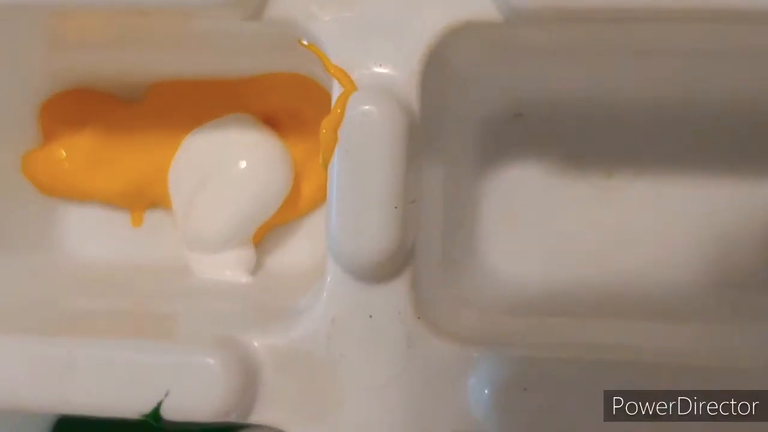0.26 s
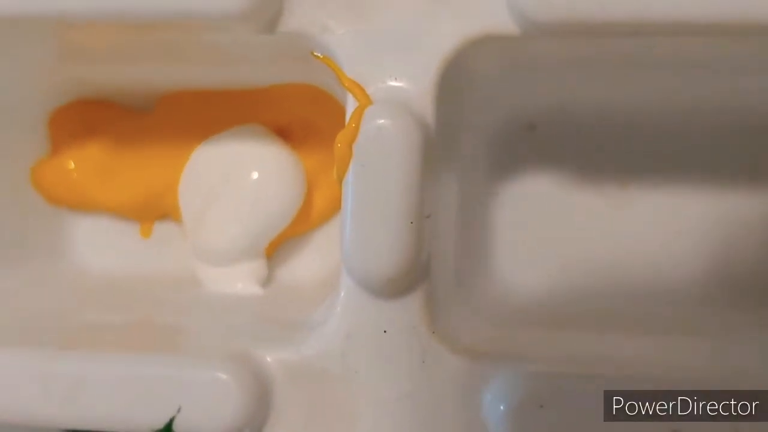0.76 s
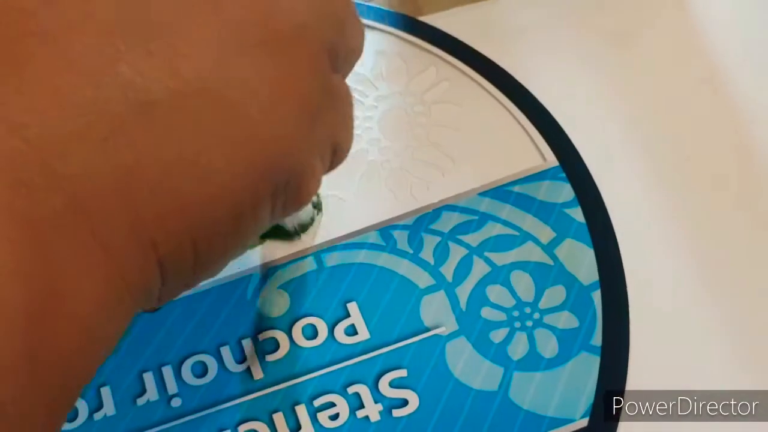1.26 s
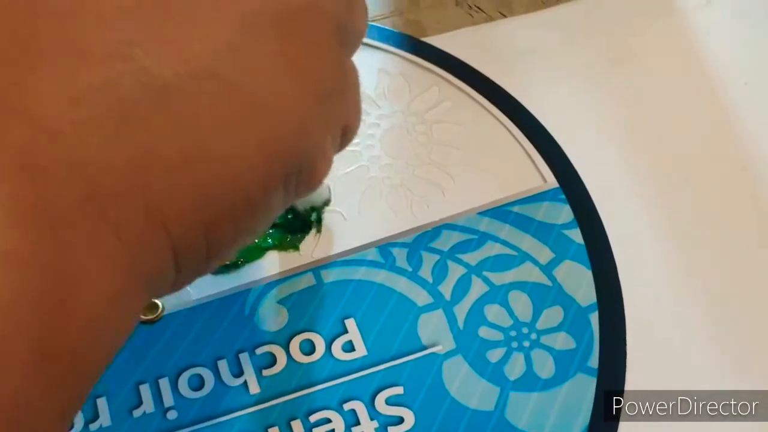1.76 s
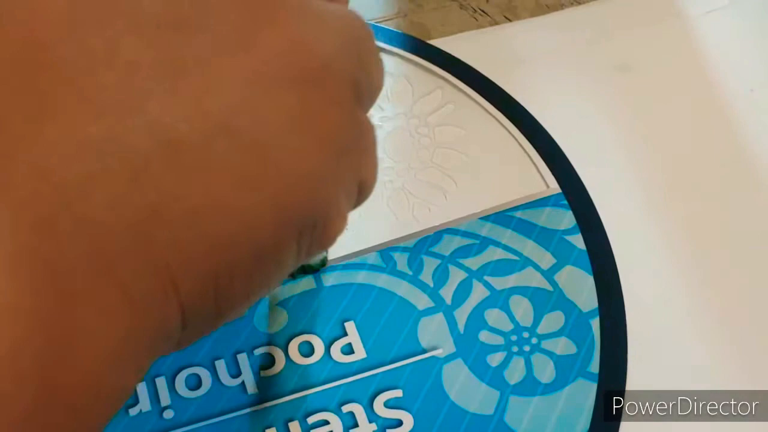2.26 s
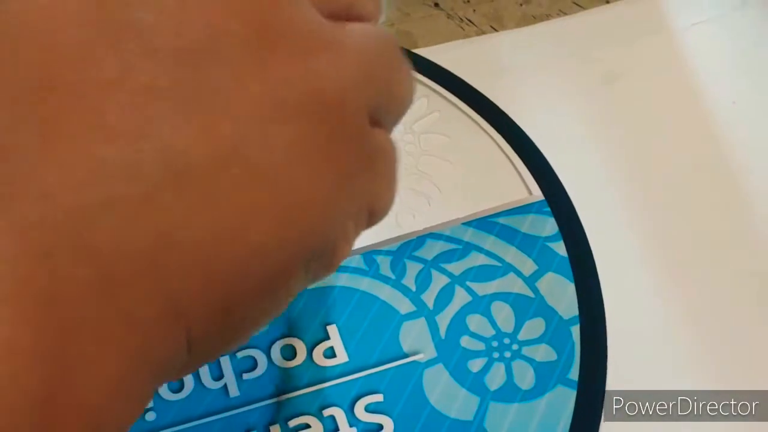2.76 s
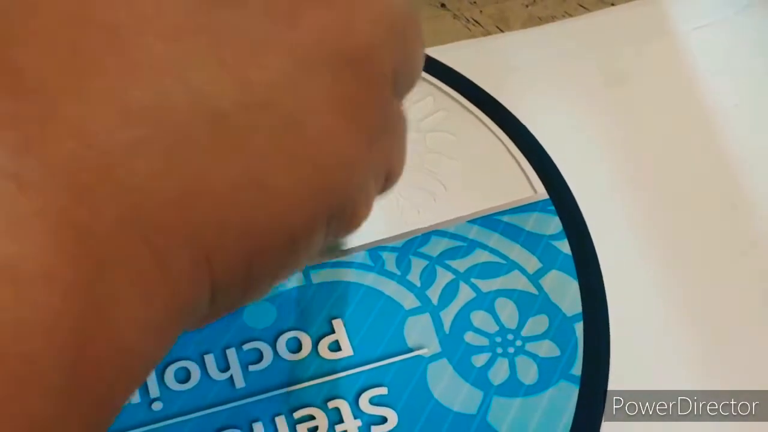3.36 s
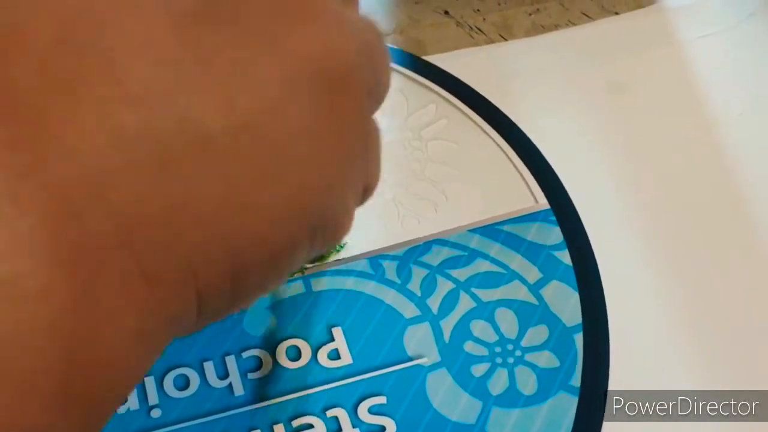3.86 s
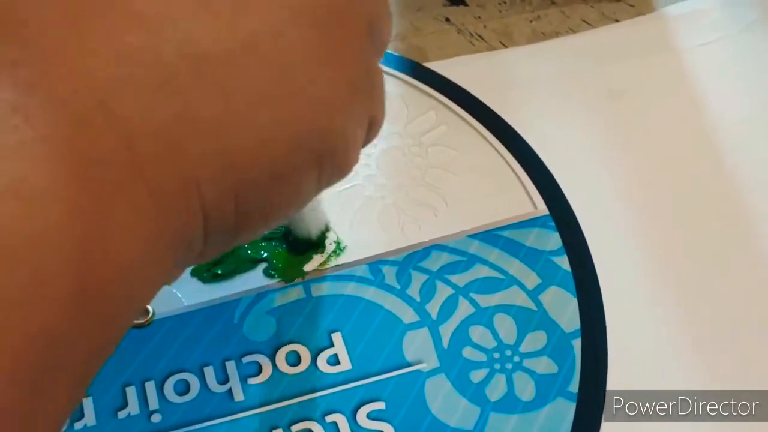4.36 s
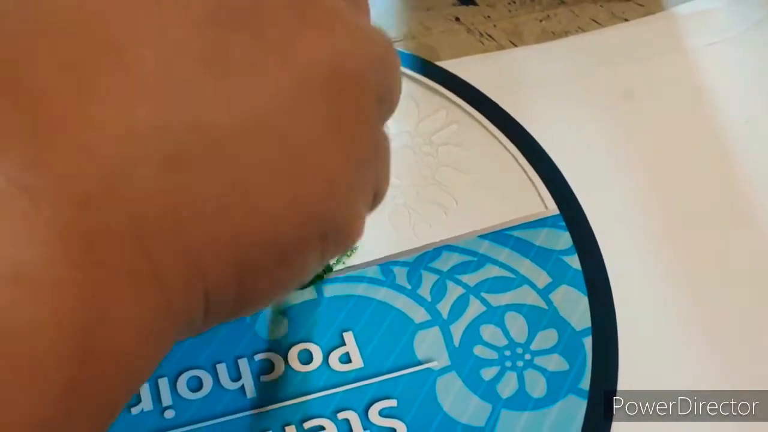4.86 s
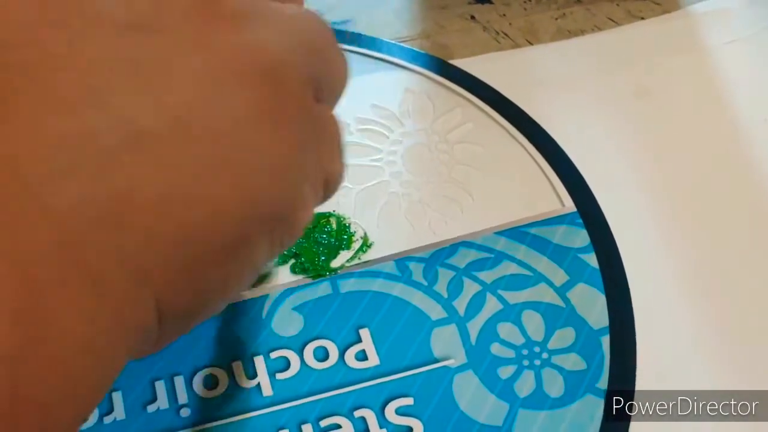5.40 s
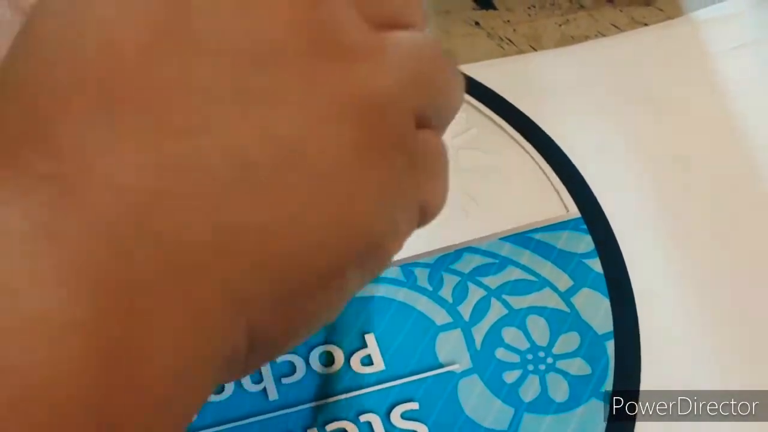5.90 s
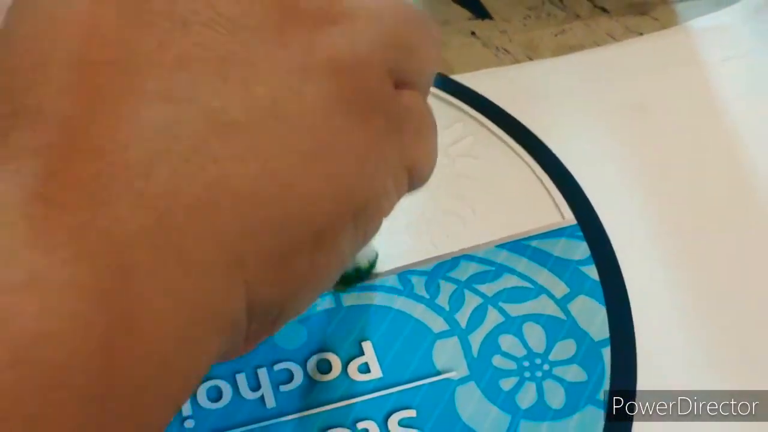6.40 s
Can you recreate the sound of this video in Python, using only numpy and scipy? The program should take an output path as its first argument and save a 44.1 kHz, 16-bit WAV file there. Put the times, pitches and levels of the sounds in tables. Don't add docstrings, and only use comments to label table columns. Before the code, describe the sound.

Close, quick brush dabs slap plastic and thump a stretched canvas like a damped drum, while sticky paint snaps faintly in a quiet room.

```python
import sys
import numpy as np
from scipy import signal
from scipy.fft import rfft, irfft, next_fast_len
from scipy.io import wavfile
from scipy.ndimage import uniform_filter1d

SR = 44100
rng = np.random.default_rng(int(sys.argv[2]) if len(sys.argv) > 2 else 0)


def put_to_file(sound):
    columns = np.atleast_2d(sound).T
    safe = np.clip(columns, -1, 1)
    whole_steps = np.round(safe * 32767)
    wavfile.write(sys.argv[1], SR, whole_steps.astype(np.int16))


def makeup_ratio(level_db):
    decades = np.asarray(level_db, float) / 20
    return 10 ** decades


N = 292824
SIZE = next_fast_len(N + SR // 10, True)
TIME = np.arange(N) / SR
FREQ = np.arange(SIZE // 2 + 1) * SR / SIZE + 1e-3
CHANGE_S = .74995


def unit(x):
    return x / np.sqrt(np.mean(x ** 2))


def wave(spectrum):
    return irfft(spectrum, SIZE)[..., :N]


def along(hz, values):
    return np.interp(np.log(FREQ), np.log(hz), values)


def gain_of(colour):
    hz, db = np.transpose(colour)
    return makeup_ratio(along(hz, db))


def shape(x, gain):
    cepstrum = irfft(np.log(gain + 1e-9), SIZE)
    cepstrum[1:SIZE // 2] *= 2
    cepstrum[SIZE // 2 + 1:] = 0
    return wave(rfft(x, SIZE) * np.exp(rfft(cepstrum)))


# (frequency [Hz], likeness [0-1])
LIKENESS_AT_MICROPHONES = [(60, 1), (300, 0.71), (700, 0.69), (1300, 0), (2500, 1), (7000, 0.32),
                           (9000, 0.55)]


def pair(first, second, keep=1., gain=1.):
    hz, like = np.transpose(LIKENESS_AT_MICROPHONES)
    like = np.clip(keep * along(hz, like), 0, 1)
    mid = rfft(first, SIZE) * np.sqrt(1 + like)
    side = rfft(second, SIZE) * np.sqrt(1 - like)
    return wave(gain * np.array([mid + side, mid - side]))


def noise(colour, keep=1.):
    return unit(pair(*rng.standard_normal((2, N)), keep, gain_of(colour)))


def burst(at, rise, fade):
    out = np.zeros(N)
    near = slice(max(int((at - 9 * rise) * SR), 0), int((at + 9 * fade) * SR))
    t = TIME[near] - at
    out[near] = np.exp(np.where(t < 0, t / max(rise, 1e-4), -t / fade))
    return out


def held(at, length, release):
    out = np.zeros(N)
    near = slice(int(at * SR), int((at + length + 12 * release) * SR))
    out[near] = 1 / (1 + np.exp((TIME[near] - at - length) / release))
    return out


def modes(x, table, spread_db):
    out = 0
    for (hz, db, t60), luck in zip(table, spread_db):
        pole = np.exp(2j * np.pi * hz / SR - np.log(1000) / (t60 * SR))
        strike = [0, makeup_ratio(db + luck) * pole.imag]
        out = out + signal.lfilter(strike, [1, -2 * pole.real, abs(pole) ** 2], x)
    return out


def add(out, at, sound):
    start = int(at * SR)
    out[:, start:start + sound.shape[1]] += sound[:, :N - start]


# (frequency [Hz], level [dB per Hz])
HUSH_COLOUR = [(15, -37), (25, -2.5), (80, -1), (161, -10), (203, -9.5), (256, -14), (555, -13.5),
               (615, -15), (2750, -36.5), (12000, -47.5), (15600, -68), (22000, -120)]


def hush():
    bump_colour = [(70, -20), (110, -4), (185, 4), (270, -7), (380, 0), (520, -3.5), (800, -32), (2000, -63)]
    bump = makeup_ratio(-58) * uniform_filter1d(burst(.35, .03, .06), int(.05 * SR))
    lead_in = makeup_ratio(-54) * burst(CHANGE_S, .012, .012)
    air = makeup_ratio(-70.5) * noise(HUSH_COLOUR, 0.42)
    return air + (bump + lead_in) * noise(bump_colour)


# (time [s], thump level [dB], pitch [Hz], overtone level [dB])
THUMPS = [(0.7315, -29.0, 87, -13.5), (0.9375, -34.0, 106, -7.0), (1.117, -36.0, 100, -23.0),
          (1.339, -29.5, 86, -8.5), (1.527, -37.5, 102, -6.5), (1.716, -43.0, 92, -17.5),
          (1.928, -32.5, 82, -5.0), (2.1205, -40.5, 70, -14.0), (2.3405, -35.0, 68, -4.5),
          (2.5845, -26.5, 88, -17.0), (2.81, -34.0, 82, -6.5), (3.053, -35.0, 78, -3.5),
          (3.2965, -29.5, 86, -13.0), (3.551, -30.0, 84, 0.0), (3.7705, -27.0, 98, -4.5),
          (3.9865, -28.5, 98, -16.0), (4.1795, -34.0, 84, -23.0), (4.3745, -36.5, 90, -32.5),
          (4.5635, -39.0, 92, -21.0), (4.757, -32.0, 72, -3.0), (5.0375, -20.5, 94, -9.0),
          (5.2575, -21.5, 94, -7.5), (5.5135, -22.5, 88, -20.5), (5.722, -32.0, 74, -1.0),
          (5.922, -47.5, 102, 6.0), (6.12, -41.5, 98, -9.0), (6.322, -41.5, 102, -12.0),
          (6.515, -36.5, 98, -28.5)]
# (frequency [Hz], level [dB], T60 [s])
CLOTH_RING = [(130, -8, .24), (150, -10, .22), (184, -10, .12)]


def canvas():
    out, shudder = np.zeros((2, N)), np.zeros(N)
    t = np.arange(SR // 3) / SR
    lucks = rng.standard_normal((len(THUMPS), 3))
    push = np.exp(-((t - .02) / 0.00088) ** 2)
    for (s, db, hz, over_db), luck, dab in zip(THUMPS, lucks, DABS):
        free_s = .026 - .0005 * (db + 30)
        over_hz = 173 * (1 + .012 * luck[0])
        free = (1 - np.exp(-(t / .006) ** 2)) / (1 + np.exp((t - free_s) / .003))
        swing = -free * np.sin(2 * np.pi * hz * t)
        swing = swing - .3 * swing ** 2
        over = -makeup_ratio(over_db) * free * np.sin(2 * np.pi * over_hz * t)
        ring = makeup_ratio(over_db / 2) * modes(push / push.sum(), CLOTH_RING, 1.5 * luck)
        sides = makeup_ratio([[.4], [-.4]])
        add(out, s, makeup_ratio(db) * (swing * sides + over + ring))
        shudder += makeup_ratio(0.56 * db - 36) * held(s + 0.015, dab[3], 0.025)
    rumble = noise([(25, -2.5), (60, -2.5), (110, 1), (200, -5), (300, -14.5), (600, -47)])
    return out + shudder * rumble


# (time [s], slap level [dB], crackle level [dB], time pressed [s])
DABS = [(0.7438, -32.5, -53.5, 0.13), (0.937, -34.0, -53.0, 0.094), (1.1117, -42.5, -57.5, 0.125),
        (1.3385, -34.0, -61.5, 0.1), (1.5352, -42.5, -59.0, 0.105), (1.7172, -37.5, -60.5, 0.13),
        (1.9255, -39.0, -52.0, 0.12), (2.1205, -40.5, -62.5, 0.13), (2.341, -46.5, -63.0, 0.11),
        (2.5855, -32.0, -61.0, 0.13), (2.8105, -37.0, -65.5, 0.14), (3.0555, -39.0, -64.0, 0.125),
        (3.2971, -26.5, -63.0, 0.096), (3.5378, -37.0, -60.0, 0.1), (3.7667, -35.0, -61.5, 0.15),
        (3.9868, -39.5, -56.5, 0.13), (4.1811, -36.0, -61.0, 0.12), (4.3745, -44.0, -61.5, 0.125),
        (4.5495, -61.0, -59.0, 0.1), (4.759, -40.5, -65.5, 0.14), (5.0389, -23.5, -56.5, 0.094),
        (5.2588, -29.0, -55.5, 0.1), (5.5149, -28.5, -56.0, 0.14), (5.7245, -30.0, -62.5, 0.15),
        (5.9188, -41.0, -62.5, 0.2), (6.1135, -43.5, -64.5, 0.16), (6.3165, -41.0, -61.5, 0.125),
        (6.5095, -56.0, -61.5, 0.15)]
SHEET_HZ = [4000, 3700, 3800, 4000, 3750, 4300, 5100, 4350, 3300, 4150, 4200, 4300, 3000, 5000, 3850, 3150,
            3450, 4900, 5200, 4900, 3800, 4700, 5350, 4350, 3400, 3150, 3400, 3850]


def slaps():
    out = np.zeros((2, N))
    t = np.arange(SR // 20) / SR
    unevenness = makeup_ratio(2.34 * rng.exponential(size=(len(DABS), 1, len(t))))
    tips = rng.standard_normal((len(DABS), 2, len(t))) * unevenness
    for (s, db, _, _), hz, tip in zip(DABS, SHEET_HZ, tips):
        length = .0065 * 2 ** (-(db + 35) / 13)
        slap = unit(tip) * (1 - np.exp(-(t / 0.00061) ** 2)) * np.exp(-t / length)
        slap = slap + modes(slap, [(hz, -16, .002)], [0])
        add(out, s, makeup_ratio(db - 7) * slap)
    return signal.sosfilt(signal.butter(1, 7000, fs=SR, output="sos"), out)


# (frequency [Hz], level [dB])
CRACKLE_COLOUR = [(700, -2), (1500, -4.5), (2400, -3), (3500, -2), (5000, -3), (7500, 0.5), (11000, 3)]


def grit():
    return unit(rng.standard_normal(N) * makeup_ratio(2.5 * rng.exponential(size=N)))


def patchy(x, depth_db, span_s):
    out, spectrum = 0, rfft(x, SIZE)
    for hz in 700 * 2 ** np.arange(0, 4.4, .25):
        band = wave(spectrum * np.clip(1 - 4 * abs(np.log2(FREQ / hz)), 0, 1))
        swell = unit(uniform_filter1d(rng.standard_normal(N), int(span_s * SR)))
        out = out + band * makeup_ratio(depth_db * swell)
    return out


def bristles():
    clumps = makeup_ratio(2.5 * unit(uniform_filter1d(rng.standard_normal(N), 130)))
    ticks = patchy(pair(grit(), grit()), 3, .016) * clumps
    return shape(ticks, gain_of(CRACKLE_COLOUR))


def pressing():
    return sum(makeup_ratio(db) * held(s, pressed, .014) * burst(s, 0, .1) for s, _, db, pressed in DABS)


# (time [s], level [dB])
AJAR = [(0.76, 0), (0.92, 3.5), (1.09, 0), (1.77, -4.5), (2.0, -0.7), (2.41, -9), (2.66, -2.5), (2.92, -8),
        (3.2, 0.7), (4.3, -0.7), (4.67, 1.5), (4.82, -1.5), (5.3, 1.5), (5.95, -1.5), (6.64, -2.5)]


def ajar_db():
    return np.interp(TIME, *np.transpose(AJAR))


def gate():
    out = 0
    for s, _, _, pressed in DABS:
        out = np.maximum(out, held(s, pressed, 0.037))
    return out


# (time [s], knock level [dB], low modes level [dB], loudest mode [Hz], high modes level [dB])
KNOCKS = [(0.747, -45.5, -7.5, 400, -13.5), (0.938, -44.0, -9.0, 441, -4.5),
          (1.115, -47.0, -8.5, 514, -2.0), (1.347, -37.5, -22.0, 374, -15.5),
          (1.534, -47.5, -6.0, 511, -7.0), (1.72, -44.5, -21.5, 524, -3.0),
          (1.925, -40.5, -22.0, 541, -14.5), (2.12, -46.5, 5.0, 374, -11.5),
          (2.343, -38.5, -2.5, 530, -18.0), (2.584, -36.5, -3.5, 506, -6.5),
          (2.811, -46.0, -3.0, 371, -7.5), (3.055, -35.5, -20.5, 532, -4.5),
          (3.296, -37.0, -14.0, 511, -11.5), (3.543, -40.5, 1.5, 304, -9.0),
          (3.768, -30.0, -7.0, 301, -15.5), (3.986, -37.0, -12.5, 436, -10.0),
          (4.18, -38.0, -18.0, 506, -10.0), (4.376, -35.5, -13.0, 371, -12.0),
          (4.564, -38.5, -6.0, 298, -11.5), (4.76, -36.5, -4.0, 532, -15.5),
          (5.038, -34.5, -5.5, 376, -18.0), (5.261, -37.5, -9.5, 452, -12.5),
          (5.515, -31.0, -14.0, 298, -16.0), (5.725, -41.0, -5.5, 506, 0.0),
          (5.927, -46.5, -0.5, 419, -3.0), (6.115, -43.5, -14.5, 374, -17.0),
          (6.32, -47.5, -10.0, 425, -5.5), (6.515, -45.5, -13.5, 508, -10.5)]
# (frequency [Hz], level [dB], T60 [s])
FRAME_MODES = [(250, -5, 0.15), (304, 1.5, 0.12), (374, -1, 0.062), (440, 0, 0.049), (520, -2.5, 0.06),
               (640, -10, 0.07), (800, 4.5, .05), (950, 0, 0.032), (1085, 0.5, 0.023), (1350, -15, 0.013)]


def frame():
    out = np.zeros((2, N))
    t = np.arange(SR // 4) / SR
    shoves = rng.standard_normal((len(KNOCKS), len(t)))
    lucks = rng.standard_normal((len(KNOCKS), len(FRAME_MODES)))
    hz = np.transpose(FRAME_MODES)[0]
    for (s, db, low_db, best_hz, high_db), shove, luck in zip(KNOCKS, shoves, lucks):
        shake = shove * (np.exp(-((t - .012) / 0.0084) ** 2) + 0.28 * np.exp(-t / 0.061))
        place_db = np.where(hz < 350, low_db, np.where(hz > 700, high_db, 0))
        place_db = place_db + 6 * np.exp(-(np.log2(hz / best_hz) / .15) ** 2)
        knock = modes(shake, FRAME_MODES, place_db + 1.2 * luck)
        add(out, s, makeup_ratio(db - 30.5) * knock * makeup_ratio([[-.4], [.4]]))
    return out


# (frequency [Hz], level [dB per Hz])
AIR_COLOUR = [(15, -48), (25, 4), (124, -7), (185, -10.5), (300, -13.5), (441, -11), (715, -15.5),
              (1180, -16), (1550, -19.5), (2500, -35), (3250, -49), (5500, -120)]
# (frequency [Hz], width [Hz], level [dB])
DRONE = [(149, 10, -2.5), (193, 23, -3.5), (118.6, 9.3, -4.5)]
# (frequency [Hz], level [dB], duration [s])
TABLE_HUM = [(157, -54, .5), (197, -59, .9), (235, -66, 1.05), (72, -58, .15)]


def drone():
    peaks = sum(makeup_ratio(db) / (1 + ((FREQ - hz) / width) ** 2) for hz, width, db in DRONE)
    level_db = np.maximum(-55 - 9 * (TIME - CHANGE_S), -66)
    return makeup_ratio(level_db - 6.5) * unit(wave(rfft(rng.standard_normal(N), SIZE) * peaks))


def table_hum():
    waver = .012 * unit(uniform_filter1d(rng.standard_normal(N), 5000))
    turns = np.cumsum(1 - .04 * burst(CHANGE_S, 0, .08) + waver) / SR
    out = 0
    for hz, db, length in TABLE_HUM:
        out = out + held(CHANGE_S, length, 0.052) * makeup_ratio(db) * np.sin(2 * np.pi * hz * turns)
    return out


def room():
    air = makeup_ratio(-60.5 + ajar_db()) * noise(AIR_COLOUR, 0.7)
    return makeup_ratio(10 * gate()) * (air + drone()) + table_hum()


# (time [s], level [dB], ring [Hz], dull share [dB], bright share [dB])
TICKS = [(0.786, -32.5, 4850, -19, -5), (0.8384, -53, 5040, -7, 7), (2.6876, -36.5, 4330, -7, 4),
         (2.9153, -33, 4800, -11, 3), (3.38, -38.5, 4020, -12, 1.5), (3.5456, -32, 4900, 1.5, -2.5),
         (3.6047, -44, 4580, -5, 2.5), (3.627, -36, 4600, 0, -15), (3.6707, -34.5, 4900, 4, -15),
         (3.6985, -34, 4850, 4, -17), (3.8712, -36.5, 4200, -15, -5), (4.5282, -38, 3020, -2.5, 3),
         (5.3324, -35.5, 4320, -15, 0), (5.5668, -32.5, 4540, -9, 2.5), (6.2057, -54, 4200, -7, 27),
         (6.391, -48, 4040, -5, 0)]


def lifting_ticks():
    out = np.zeros((2, N))
    click = 1. * (np.arange(SR // 20) == 0)
    for s, db, hz, dull_db, bright_db in TICKS:
        parts = [(hz, 0, .0065), (2300, dull_db, .002), (10000, bright_db, .003)]
        add(out, s, makeup_ratio(db - 9) * (0.53 * click + modes(click, parts, [0, 0, 0]))[None])
    return out


# (time [s], snap level [dB], length [s], dull share [dB])
PEELS = [(0.808, -48, .009, -12), (1.4104, -48, .003, 1.5), (1.7619, -56, .0065, -12),
         (1.806, -50, .011, 2.5), (1.999, -60, .011, -18), (2.206, -52, .007, 6),
         (2.6833, -36.5, .0105, -11), (2.915, -38, .0105, -1.5), (3.152, -35, .007, -5),
         (3.3085, -40.5, .004, -25), (3.381, -50.5, .0105, 4), (3.6237, -39, .005, -4),
         (3.7734, -41.5, .0038, 2.5), (3.849, -47, .0054, -11), (3.869, -47.5, .005, 4.5),
         (4.1985, -49, .007, -12), (4.3884, -44.5, .0055, -11), (4.455, -43, .008, -16),
         (4.558, -48, .006, -10), (2.887, -50, .004, -10), (2.413, -58, .005, -10), (5.042, -38, .002, -20),
         (6.218, -56, .004, -12), (5.93, -50, .004, -12), (4.772, -45, .0032, -1.5),
         (4.8485, -51.5, .0057, -17), (5.0935, -53, .0057, -12), (5.1074, -48, .005, -18),
         (5.327, -46, .0054, -11), (5.589, -42, .009, 1.5), (5.7397, -41.5, .005, -9),
         (5.8155, -51.5, .0075, -11), (6.532, -55, .007, -11), (6.6084, -50.5, .0045, -12)]


def peeling():
    snaps, dull = np.zeros((2, N))
    for s, snap_db, length, dull_db in PEELS:
        snap = makeup_ratio(snap_db - 8) * burst(s + 0.003, 1.05 * length, length)
        snaps, dull = snaps + snap, dull + makeup_ratio(dull_db) * snap
    return snaps, dull


def small_room(source):
    t = np.arange(SR // 3) / SR
    echo = rng.standard_normal((2, len(t))) * makeup_ratio(-60 * t / .24) * (t > .004)
    echo = echo / np.sqrt(np.sum(echo[0] ** 2))
    return source + makeup_ratio(-12) * signal.fftconvolve(source, echo, axes=1)[:, :N]


# (frequency [Hz], left level [dB], right level [dB])
PORTS = [(670, -1, 4.4), (1260, -39, -3), (1590, -8, -2), (2100, 1.5, -12.5), (2350, -2, -14),
         (2750, -7, 2.5), (3600, -1.5, 2.5), (4250, -7.5, 7), (5050, -7.5, 7), (5600, -8.5, -1),
         (6550, 1.5, -10), (7650, -17.5, -15.5), (9800, -23, -22.5), (11400, -24.5, -29.5),
         (12400, -38, -40)]


def at_the_ports(source):
    hz, left_db, right_db = np.transpose(PORTS)
    steep = FREQ ** 2 / (FREQ ** 2 + 500. ** 2)
    heard = [shape(x, steep * makeup_ratio(along(hz, db))) for x, db in zip(source, (left_db, right_db))]
    return makeup_ratio(8.5) * np.array(heard)


def brush():
    snaps, dull = peeling()
    loud = pressing() + snaps
    hiss = makeup_ratio(-76 + 2.1 * ajar_db())
    ticks = bristles()
    top = signal.sosfilt(signal.butter(4, 7000, "high", fs=SR, output="sos"), ticks)
    crackle = (ticks - top) * (loud + hiss) + top * (makeup_ratio(2.5) * loud + makeup_ratio(9.5) * hiss)
    flex = noise([(150, -34), (400, 12), (1200, -24), (2200, 6), (3500, -44)])
    return at_the_ports(small_room(crackle + slaps() + lifting_ticks())) + dull * flex


# (time [s], level [dB], ring [Hz])
TAPS = [(.837, -46, 520), (.868, -50, 520), (1.806, -50, 800), (2.024, -51, 520), (2.921, -48, 700),
        (3.31, -40, 520), (3.068, -39, 620), (3.873, -50, 600), (6.037, -48, 550), (6.28, -49, 650),
        (6.498, -54, 600)]


def taps():
    out = np.zeros((2, N))
    tick = 1. * (np.arange(SR // 20) == 0)
    for s, db, hz in TAPS:
        ring = modes(tick, [(hz, 0, .02), (1.7 * hz, -6, .012)], [0, 0])
        add(out, s, makeup_ratio(db + 26) * ring[None] * hz / 7000)
    return out


def scene():
    step = -makeup_ratio(-30) * burst(CHANGE_S, 0, .001)
    top = signal.ellip(8, .2, 60, 12300, fs=SR, output="sos")
    left, right = signal.sosfilt(top, canvas() + brush() + frame() + room() + taps())
    dabbing = np.array([left, np.roll(right, 8)])
    return np.where(TIME < CHANGE_S, hush(), dabbing + step)


def band_limit(x):
    return signal.sosfilt(signal.butter(12, 15700, fs=SR, output="sos"), x)


def record(dry):
    mix = signal.sosfilt(signal.butter(1, 22, "high", fs=SR, output="sos"), dry)
    return band_limit(mix)


dry = scene()
out = record(dry)
put_to_file(out)
```